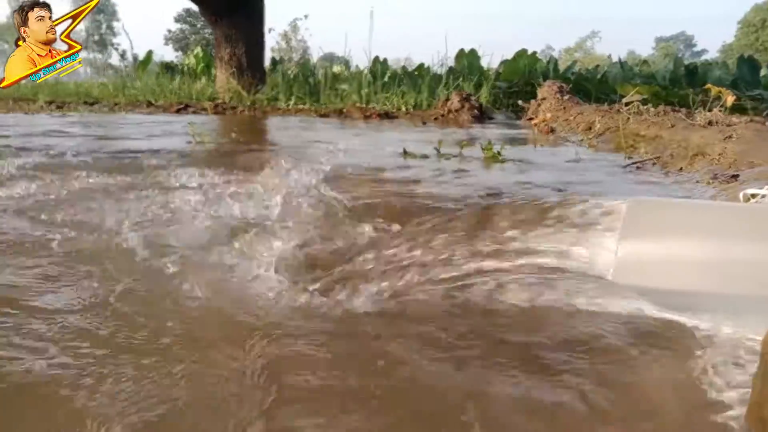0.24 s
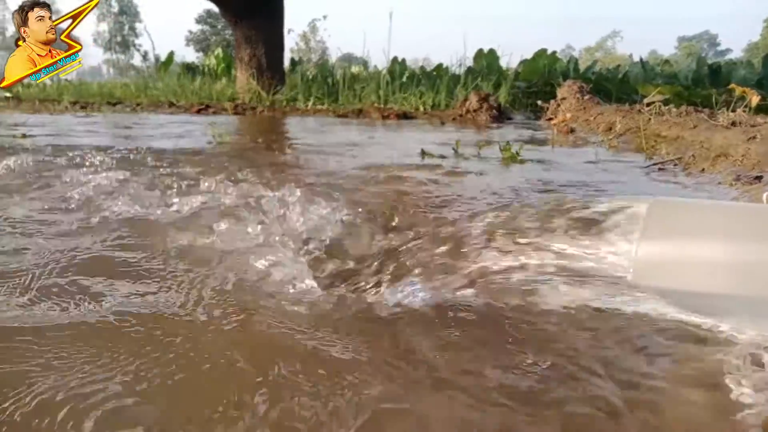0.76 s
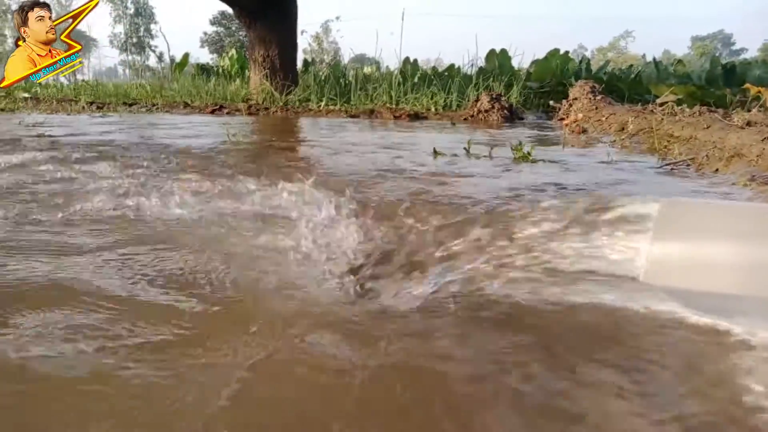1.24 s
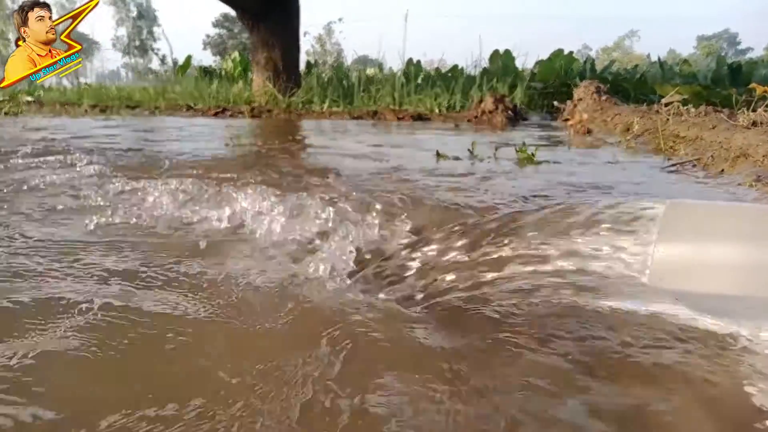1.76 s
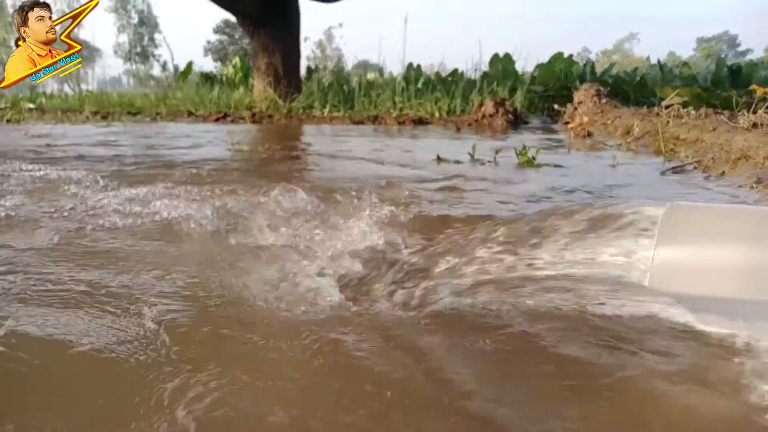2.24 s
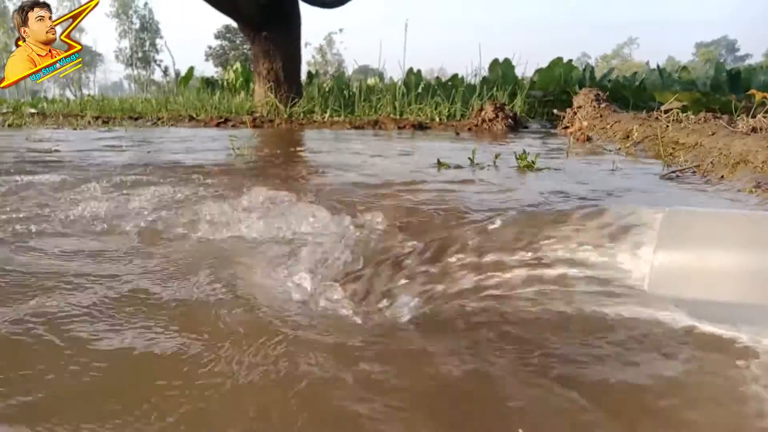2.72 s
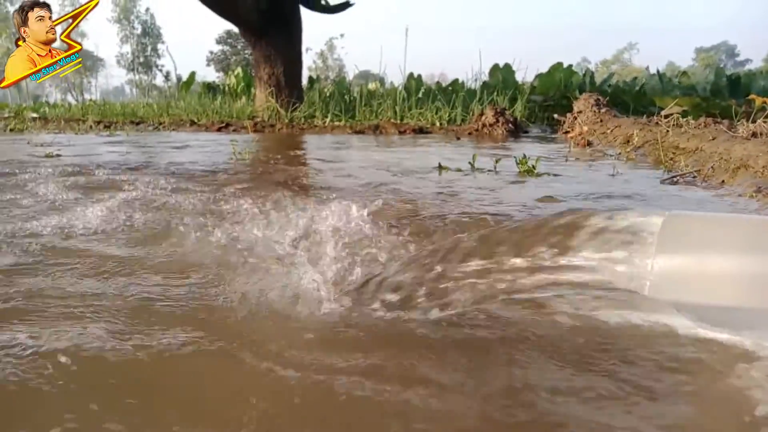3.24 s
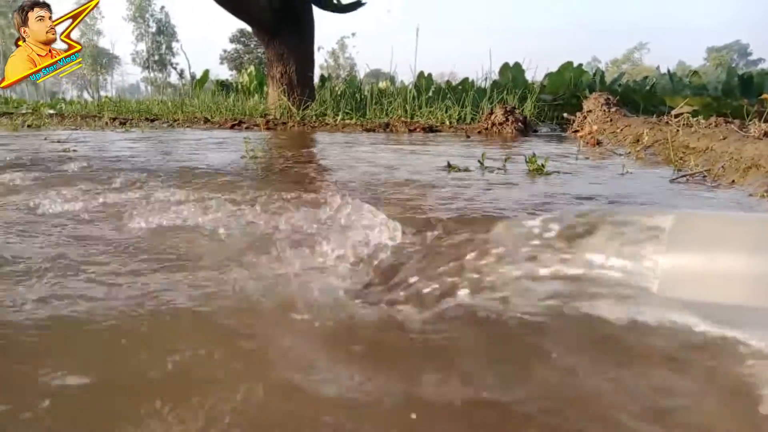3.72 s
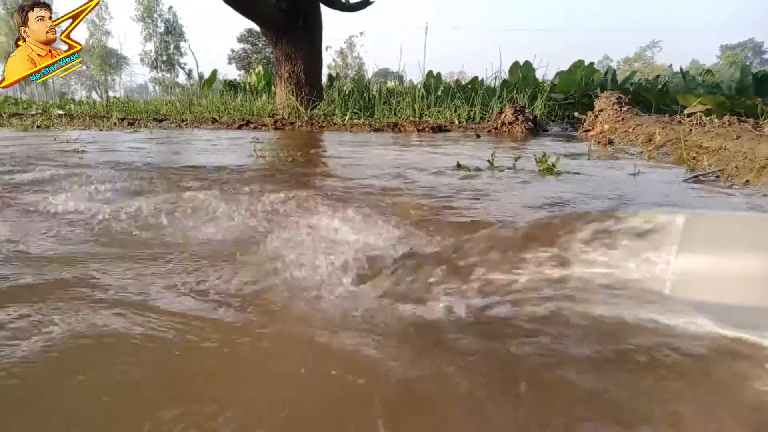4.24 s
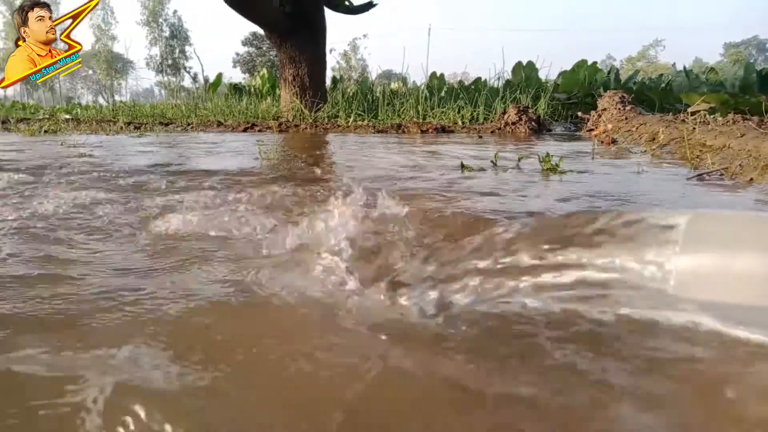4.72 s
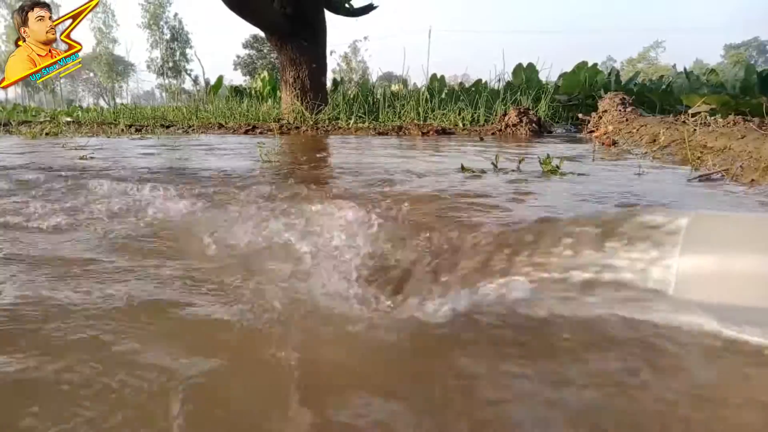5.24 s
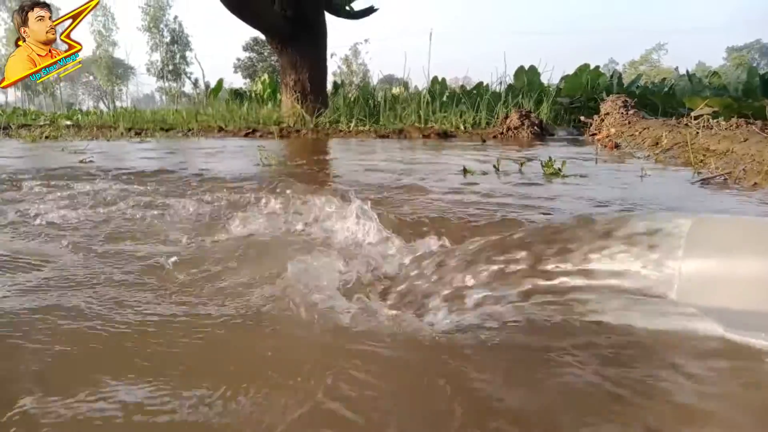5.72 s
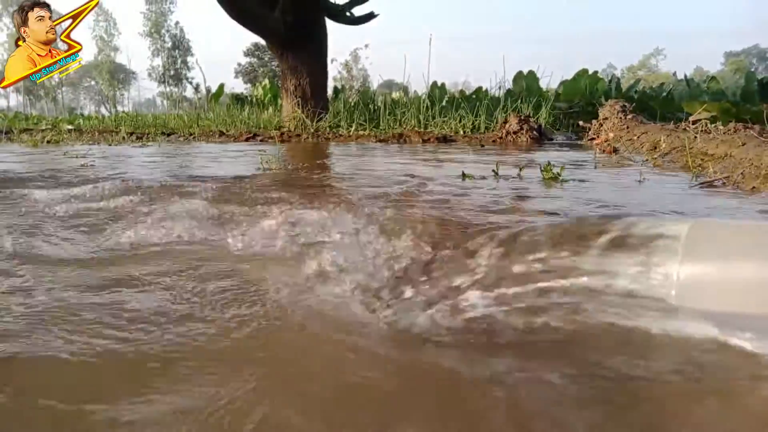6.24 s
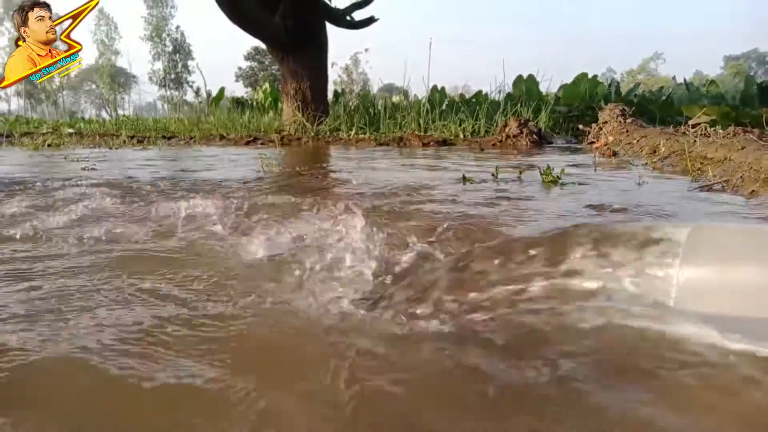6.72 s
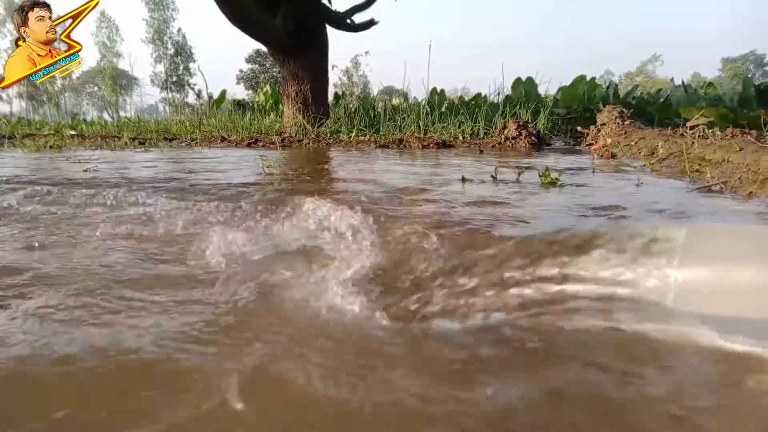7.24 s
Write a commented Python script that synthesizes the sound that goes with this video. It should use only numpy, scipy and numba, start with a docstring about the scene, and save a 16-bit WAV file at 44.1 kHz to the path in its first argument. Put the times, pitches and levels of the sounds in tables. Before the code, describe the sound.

Water gushes steadily from a plastic pipe into a flooded field, bubbling and splashing close by, turning duller and more muffled partway through.

```python
"""A gush of water, full of ringing bubbles: a plastic pipe pours into a flooded field, close to a low-held phone.
The jet drags air under: swarms of sliding sines ring over a rush of noise bands, and big pockets glug low.
Bursts of filtered noise make the splashes and slapping droplets; two narrow bands of noise hum as a far pump.
The way to the microphone is boxy and dull, and grows more muffled in the second half."""
import sys
import numpy as np
from scipy import signal
from scipy.fft import rfft, irfft
from scipy.io import wavfile
from scipy.ndimage import uniform_filter1d
from numba import njit

SR = 44100
rng = np.random.default_rng(int(sys.argv[2]) if len(sys.argv) > 2 else 0)


def log_audio(samples):
    """Write samples as a 16-bit WAV file to the path given in sys.argv[1]."""
    # one column per channel
    frames = np.atleast_2d(samples).T
    # limit to full scale, then quantise
    limited = np.clip(frames, -1, 1)
    pcm = np.round(limited * 32767).astype(np.int16)
    wavfile.write(sys.argv[1], SR, pcm)


N = 329427
T = np.arange(N) / SR  # seconds
HZ = np.maximum(np.arange(N // 2 + 1) * SR / N, 1)  # pitch of each bin of a whole-length spectrum

# Loud single bubbles that stand out close to the microphone.
# Each row: start in seconds, peak in dB, starting pitch in Hz, length in cycles of that pitch (at least 2 sound).
LOUD_BUBBLES = [(0.037, -23, 1730, 27), (0.078, -10, 1946, 26), (0.046, -18, 910, 10.5),
                (0.128, -21.5, 1020, 28), (0.144, -21, 970, 28), (0.183, -22.5, 1240, 18),
                (0.366, -14, 3120, 10), (0.432, -15, 2140, 5), (0.447, -1, 2490, 3.5),
                (0.483, -23, 1700, 30), (0.585, -19.5, 940, 11), (0.606, -11, 2370, 6.5),
                (0.637, -20.5, 1150, 16), (0.647, -25, 1200, 25), (0.692, -18.5, 1920, 7),
                (0.783, -16, 1210, 18), (0.805, -18.5, 880, 10), (0.856, -16.5, 2980, 8),
                (0.88, -23, 1880, 7), (0.908, -22, 1092, 20), (0.939, -15, 2670, 22),
                (1.087, -10, 2480, 11), (1.163, -15, 2440, 18), (1.192, -14, 1430, 13),
                (1.193, -18, 840, 9), (1.202, -15, 2580, 20), (1.243, -20, 1270, 37),
                (1.221, -11.5, 1900, 14), (1.275, -7.5, 2520, 8), (1.301, -18, 1550, 29),
                (1.33, -20.5, 1194, 22), (1.373, -3.5, 2480, 21), (1.397, -11.5, 2510, 19),
                (1.398, -28.5, 896, 10), (1.412, -22.5, 890, 15), (1.439, -16, 2580, 50),
                (1.474, -17.5, 2670, 14), (1.508, -13.5, 1750, 12), (1.545, -12.5, 2480, 33),
                (1.575, -12, 2620, 15), (1.651, -22.5, 1395, 22), (1.77, -16.5, 2570, 26),
                (1.89, -26.5, 790, 12), (1.948, -24, 686, 9), (1.958, -5.5, 2520, 9),
                (1.99, -13.5, 1460, 10), (2.056, -14.5, 1655, 26), (2.097, -10.5, 2490, 28),
                (2.1, -16, 2580, 26), (2.113, -20, 1440, 14), (2.141, -14, 815, 3), (2.142, -21, 2520, 1),
                (2.168, -19, 2500, 35), (2.194, -13, 2370, 19), (2.209, -11.5, 1790, 20),
                (2.26, -10.5, 2550, 27), (2.267, -12.5, 1720, 11), (2.288, -6.5, 2430, 10),
                (2.296, -23.5, 1205, 30), (2.371, -15, 3785, 23), (2.408, -20, 2330, 44),
                (2.641, -15, 2490, 18), (2.662, -15.5, 2580, 25), (2.754, -15.5, 1720, 11),
                (2.804, -19.5, 1384, 34), (2.837, -10, 3180, 22), (2.896, -19, 2370, 15),
                (2.933, -11.5, 1387, 24), (2.97, -13, 1227, 22), (3.056, -10.5, 2505, 40),
                (3.076, -24, 867, 20), (3.123, -14, 2590, 11), (3.161, -13, 2420, 11),
                (3.087, -19.5, 845, 22), (3.189, -25.5, 1100, 20), (3.229, -17, 2520, 33),
                (3.262, -20, 1750, 7), (3.342, -18.5, 1730, 12), (3.362, -21.5, 701, 13),
                (3.467, -15.5, 1670, 18), (3.505, -14.5, 2540, 35), (3.568, -16, 1510, 11),
                (3.644, -17, 2540, 32), (3.66, -9, 2800, 10), (3.701, -17.5, 1250, 19),
                (3.759, -14.5, 2520, 22), (3.803, -15, 2420, 15), (3.818, -14, 2500, 14),
                (3.862, -15.5, 1176, 18.5), (3.954, -19, 2480, 44), (4.022, -15, 1776, 7.5),
                (4.17, -14, 2020, 18), (4.186, -13.5, 2400, 17.5), (4.193, -19, 2236, 18),
                (4.216, -18, 2450, 23), (4.299, -15, 1490, 12), (4.315, -17.5, 2070, 23),
                (4.433, -15, 2440, 11), (4.456, -19.5, 1840, 18), (4.477, -15.5, 1830, 13),
                (4.495, -13, 1284, 16), (4.503, -11, 1865, 23), (4.6, -18.5, 2000, 16),
                (4.705, -21, 2580, 27), (4.722, -20, 1306, 22), (4.745, -20.5, 1690, 14),
                (4.777, -19.5, 2470, 20), (4.819, -15, 1900, 14), (4.871, -22.5, 1450, 24),
                (5.028, -20.5, 1470, 19), (5.047, -21.5, 2650, 16), (5.147, -18, 1450, 14),
                (5.416, -13.5, 1280, 4.5), (5.475, -6.5, 2154, 16), (5.499, -17.5, 960, 8.5),
                (5.544, -14, 1430, 11), (5.656, -16.5, 1051, 38), (5.667, -19, 1710, 11),
                (5.697, -7, 1885, 30), (5.725, -13.5, 927, 13.5), (5.781, -15.5, 1200, 3),
                (5.943, -24, 1190, 22), (6.01, -23.5, 975, 16), (6.062, -27, 1250, 13),
                (6.09, -25, 1180, 19), (6.105, -19, 636, 2), (6.157, -19.5, 1900, 19),
                (6.2, -19, 1530, 8.5), (6.234, -26, 1245, 30), (6.264, -24.5, 900, 10),
                (6.329, -25, 667, 3.5), (6.353, -22, 1830, 27), (6.444, -23, 1490, 12),
                (6.55, -20, 1290, 11), (6.586, -26, 1070, 23), (6.631, -24.5, 865, 23),
                (6.672, -23, 1940, 19), (6.709, -23.5, 1180, 17), (6.738, -29.5, 1210, 21),
                (6.894, -17, 1556, 10), (6.992, -23.5, 1930, 18), (6.952, -26, 790, 10),
                (7.014, -17.5, 2510, 8), (7.183, -18, 954, 9.5), (7.277, -20.5, 1306, 8),
                (7.352, -17.5, 1540, 11), (7.359, -21.5, 1214, 28), (7.438, -23, 1200, 12),
                (7.456, -21.5, 1210, 27)]


def undb(db):
    """Decibels to gain."""
    return 10 ** (np.asarray(db) / 20)


def level(x, db):
    """Scale to an rms level in dB."""
    return x * undb(db) / np.sqrt(np.mean(x ** 2))


def walk(rate):
    """Random levels held 1 / rate s and slewed twice; spread near 1."""
    hold = int(SR / rate)
    steps = np.repeat(rng.standard_normal(N // hold + 1), hold)
    return 1.25 * uniform_filter1d(uniform_filter1d(steps, hold), hold)[:N]


def through(x, gain_db):
    """Filter by the causal, minimum-phase response that has the given gain over pitch."""
    hz = np.maximum(np.arange(4097) * SR / 8192, 1)
    cepstrum = irfft(np.log(undb(gain_db(hz))))
    # folding the cepstrum forward in time makes the response causal
    cepstrum[1:4096] *= 2
    cepstrum[4097:] = 0
    response = irfft(np.exp(rfft(cepstrum)))
    return signal.fftconvolve(x, response)[:N]


def cavity_db(hz):
    """Resonant bumps and dips of the hollow around the microphone."""
    # Each row: centre in Hz, width in Hz, height in dB (negative is a dip).
    cavity = [(301, 286, 13.5), (328, 44, -10), (1042.4, 30, -6.5), (1262, 165, 6), (1342, 71, -7.5),
              (1892, 140, 5), (2234, 72, -11), (2494, 150, 5), (3035, 29, -19.5), (3180, 240, 7),
              (3410, 110, -4), (3660, 200, 6.5), (3905, 240, -5.5)]
    return sum(bump_db / (1 + (2 * (hz - centre) / width) ** 2) for centre, width, bump_db in cavity)


def colour_db(hz):
    """Gain of the way from the water to the microphone, cavity included."""
    # Broad colour of the way. Each row: pitch in Hz, gain in dB.
    colour = [(25, -57), (71, -7.5), (141, -23.5), (243, -20.5), (339, -26), (429, -13.5), (1030, -2.5),
              (1250, -2.5), (2200, -5.5), (2480, -3), (3700, -14), (7190, -54.5), (9350, -71.5)]
    f, db = np.transpose(colour)
    return np.interp(np.log(hz), np.log(f), db) + cavity_db(hz)


def loud_bubble_way_db(hz):
    """The loud bubbles pass the cavity and are heard dull towards the top."""
    top_hz = 4150
    return cavity_db(hz) - 10 * np.log10(1 + (hz / top_hz) ** 8)


def bass_share(hz):
    """Part of the sound that the muffling leaves alone: the pitches well below muffle_hz."""
    muffle_hz = 2247
    return 1 / (1 + (hz / muffle_hz) ** 4.56)


@njit
def ring(n, sr, start, hz, cycles, gain, glide, rise):
    """Each bubble is a sine that swells softly, dies away over its cycles and slides up as it nears the surface."""
    out = np.zeros(n)
    for e in range(len(start)):
        length = cycles[e] * sr / hz[e]
        phase = 0.
        for i in range(min(int(length), n - start[e])):
            u = i / length  # share of the bubble's life
            phase += 2 * np.pi * hz[e] * (1 + glide[e] * u) / sr
            swell = np.sin(np.pi / 2 * min(u / rise, 1.)) ** 2
            decay = np.exp(-np.log(1000) * max(u - rise, 0.) ** 1.4)
            out[start[e] + i] += gain[e] * np.sin(phase) * swell * decay
    return out


def singles(s, db, hz, cycles, glide, rise):
    """Single bubbles that stand out of the gush, each ringing from its own start."""
    start = (s * SR).astype(np.int64)
    return ring(N, 1. * SR, start, hz, np.maximum(cycles, 2), undb(db), glide + 0 * s, rise)


def litter(s, db, hz, cycles, glide, rings_db, lag_cycles, scatter):
    """Each single bubble tears off three smaller, softer ones of nearby pitch just after it."""
    s, db, hz, cycles = np.repeat([s, db, hz, cycles], 3, axis=1)
    lag, softer, detune = rng.random((3, len(s)))
    near_hz = hz * np.exp(scatter * (2 * detune - 1))
    late_s = s + lag_cycles / hz * lag
    return singles(late_s, db + rings_db - 6 * softer, near_hz, cycles, glide, 0.073)


def pump():
    """Two wavering low tones from far off, cut from noise; the lower fades as the upper grows."""
    # Each row: pitch in Hz, width in Hz, first level in dB, last level in dB.
    hum = [(81, 8.8, -59.5, -69.5), (116.6, 3.9, -60.5, -57.5)]
    turn_s, turn_width_s = 5, 0.86  # when and how fast the hum changes level
    turn = .5 + .5 * np.tanh((T - turn_s) / turn_width_s)
    out = 0
    for hz, width, first_db, last_db in hum:
        white = rfft(rng.standard_normal(N))
        tone = level(irfft(white / (1 + (2 * (HZ - hz) / width) ** 2), N), 0)
        # evened out, it wavers in pitch more than in level
        tone = tone / np.sqrt(0.36 + np.abs(signal.hilbert(tone)) ** 2 / 2)
        out = out + tone * undb(first_db + (last_db - first_db) * turn)
    return out


def spray():
    """A fine flickering hiss of dense droplets; each slap adds a short burst of hiss and of a duller body."""
    # Droplets slapping the surface. Each row: start in seconds, hiss level in dB, body over the hiss in dB.
    slaps = [(0.056, -35, 6), (0.278, -30, 2), (0.3501, -34, -2), (0.4016, -25, 3), (0.768, -26, -3),
             (0.859, -39, 5), (0.884, -33, 3), (1.021, -33, 13.5), (1.1985, -31, 20.5), (1.507, -38, 16),
             (1.957, -28.5, 15), (2.0937, -44, 22), (2.29, -42, 27), (2.37, -36, 10), (2.62, -26.5, -6),
             (2.743, -23.5, 7), (2.8977, -28.5, 22), (3.4665, -35.5, 22.5), (3.65, -29.5, 13),
             (3.858, -32, 18.5), (4.022, -26, 14), (4.169, -26.5, -1), (4.2682, -34, 7), (4.378, -29, 11),
             (4.554, -34.5, 19), (4.68, -39, 17), (5.1577, -43, 7), (5.341, -42, 14), (5.473, -47.5, 31.5),
             (5.5216, -44, 18), (5.5667, -46, 7), (5.618, -42.5, 4), (5.669, -44.5, 21.5),
             (5.7436, -44, 22), (5.787, -43, 21.5), (5.914, -48.5, 23), (5.9522, -43.5, 13),
             (5.978, -45, 10), (6.0517, -41, 5), (6.065, -49.5, 26), (6.187, -49.5, 27), (6.217, -51, 31.5),
             (6.328, -43, 10), (6.3394, -46.5, 25), (6.362, -43, 18), (6.549, -42.5, 22.5),
             (6.661, -42, 19), (6.891, -44.5, 21.5), (7.016, -52, 18), (7.1477, -46.5, 22),
             (7.179, -40, 24)]
    slap_t60_s, slap_rise_s = 0.0258, 0.0036
    white = rfft(rng.standard_normal((3, N)))
    hiss = level(irfft(white[0] * (HZ / 4300) ** 3 / (1 + (HZ / 4300) ** 11.5), N), 0)
    body = level(irfft(white[1] * (HZ / 2600) ** 2 / (1 + (HZ / 2600) ** 11), N), 0)
    mist = level(irfft(white[2] * (HZ / 4200) ** 4 / (1 + (HZ / 4200) ** 8.7), N), 0)
    out = mist * undb(-72.5 + 5.0 * walk(30) + 2.3 * walk(110))
    for s, db, body_db in slaps:
        i = int(s * SR)
        t = T[:min(2500, N - i)]
        burst = undb(db - 60 * t / slap_t60_s) * np.minimum(t / slap_rise_s, 1)
        end = i + len(t)
        out[i:end] += burst * (hiss[i:end] + undb(body_db) * body[i:end])
    return out


def glugs():
    """Big air pockets ring low and briefly, each with its litter."""
    # Each row: start in seconds, peak in dB, starting pitch in Hz.
    pockets = [(0.128, -32, 225), (0.273, -33, 233), (0.502, -36.5, 410), (0.714, -34, 425),
               (0.885, -32, 466), (1.165, -38, 261), (1.348, -37, 420), (1.442, -29, 448),
               (1.464, -28.5, 396), (1.466, -33.5, 245), (1.569, -34, 464), (1.814, -37.5, 425),
               (1.932, -30, 242), (2.136, -30.5, 243), (2.403, -39, 220), (2.455, -36, 502),
               (2.727, -33, 426), (2.737, -36.5, 238), (2.852, -27, 441), (3.118, -36, 256),
               (3.189, -41.5, 272), (3.237, -40, 275), (3.561, -33.5, 257), (4.085, -39, 233),
               (4.132, -28, 456), (4.377, -30.5, 252), (4.74, -32, 119), (4.929, -36, 207),
               (5.21, -38, 478), (5.275, -29.5, 438), (5.337, -33.5, 498), (5.534, -26, 276),
               (5.669, -29, 233), (5.814, -27, 274), (5.89, -40.5, 277), (6.059, -37, 239),
               (6.258, -32.5, 273), (6.366, -34, 482), (6.527, -42, 227), (6.764, -33.5, 253),
               (6.92, -39, 455), (7.389, -36, 245)]
    ring_s, slide = 0.049, 0.031  # ring length; upward slide as share of pitch
    s, db, hz = np.transpose(pockets)
    glug = s, db, hz, ring_s * hz
    return singles(*glug, slide, 0.12) + litter(*glug, slide, -11.5, 3.6, 0.48)


def chirps():
    """Long bubbles that slide far upward."""
    # Each row: start in seconds, peak in dB ahead of the cavity, starting pitch in Hz, slide as share of pitch.
    sliders = [(4.735, -25, 1200, 0.61), (5.062, -31, 400, 2.5), (5.1, -27.5, 600, 0.9),
               (5.7, -32.5, 900, 0.59), (2.2, -22, 1550, 0.3)]
    s, db, hz, slide = np.transpose(sliders)
    cycles = 40 + 0 * s
    return singles(s, db, hz, cycles, slide, 0.23)


def plops():
    """The loud bubbles ring almost steady in pitch, each with its litter."""
    slide = 0.029  # share of pitch
    s, db, hz, cycles = np.transpose(LOUD_BUBBLES)
    plop = s, db - cavity_db(hz), hz, cycles  # peaks are as heard inside the cavity
    return singles(*plop, slide, 0.12) + litter(*plop, slide, -10.5, 14, 0.32)


def swarm(per_s, cycles, glide, rise, spread_db, burst_db, burst_rate, lo_hz=120, hi_hz=7500):
    """Bubbles of all sizes in bursts; a few are far louder than the rest."""
    calm_hz = 3080  # towards and above this pitch the bubbles are more alike in level
    when, pitch, luck, life, slip = rng.random((5, int(per_s * N / SR)))
    start = (when * N).astype(np.int64)
    hz = lo_hz * (hi_hz / lo_hz) ** pitch
    spread_db = spread_db / (1 + (hz / calm_hz) ** 2.2)
    db = np.minimum(-spread_db * np.log(1 - luck), 3.7 * spread_db) + burst_db * walk(burst_rate)[start]
    slide = glide * slip / (1 + (hz / 1500) ** 2)  # small bubbles die before they rise far
    cycles = cycles * (.5 + life) * (hz / 1500) ** 0.51
    gain = hz ** 0.61 * undb(db)  # gain grows with pitch to even out the sum per hertz
    return level(ring(N, 1. * SR, start, hz, cycles, gain, slide, rise), 0)


def rush():
    """Noise of the jet shearing the water; each half octave flickers alone and surges with the others."""
    out, surge = 0, walk(31)
    white = rfft(rng.standard_normal(N))
    for hz in 30 * 2 ** np.arange(0, 8.5, .5):
        part = np.cos(np.pi * np.clip(np.log2(HZ / hz), -.5, .5)) ** 2
        flicker_db = (2.3 * surge + 1.4 * walk(22)) * min(hz / 200, 1)  # the deepest bands are steadier
        out = out + irfft(white * part, N) * undb(flicker_db)
    return level(out, 0)


def splashes(gain_db, t60_s):
    """A burst of broad noise where water closes over each loud bubble."""
    s, db = np.transpose(LOUD_BUBBLES)[:2]
    hits = np.zeros(N)
    hits[(s * SR).astype(int)] = undb(db + gain_db)
    t = T[:2000]
    tail = undb(-60 * t / t60_s) * np.minimum(t / 0.00099, 1)
    return signal.fftconvolve(hits, tail)[:N] * rng.standard_normal(N)


def flow_db():
    """Slow level of the stream, with moments where the gush briefly falls quiet."""
    # Stream level. Each row: time in seconds, level in dB.
    flow = [(0.0, -33.5), (0.31, -36), (0.75, -33.5), (1.02, -35), (1.39, -36), (1.52, -33.5),
            (1.79, -34.5), (2.16, -34.5), (2.27, -34.5), (2.54, -34.5), (2.77, -34.5), (3.51, -34),
            (4.14, -35), (4.6, -33), (5.37, -34.5), (5.64, -31.5), (5.82, -34.5), (7.47, -35.5)]
    # Brief lulls. Each row: time in seconds, change of level in dB.
    lulls = [(0.831, -5.5), (1.1, -1.5), (1.616, -7), (2.399, -3), (3.035, -3.5), (3.891, -0.5), (4.37, -1),
             (4.58, -3.5), (5.33, -4.5), (5.38, -3.5), (6.87, -4.5), (7.11, -2), (7.24, -2.5), (7.41, -2)]
    half_width_s = 0.019
    out = np.interp(T, *np.transpose(flow))
    for s, depth_db in lulls:
        out = out + depth_db * np.exp(-((T - s) / half_width_s) ** 2)
    return out


def gush():
    """Swarms, rush and splashes, coloured on the way to the microphone, then muffled and levelled."""
    # Muffling of the treble. Each row: time in seconds, treble gain in dB.
    muffle = [(0, 9.5), (.7, 7.5), (1.3, 8.5), (2.5, 7.5), (3.6, 7), (4.4, 6.5), (4.6, 2.5), (4.8, -8),
              (5.1, -10.5), (5.8, -18), (6.3, -13.5), (6.8, -15), (7.47, -9)]
    gurgle = swarm(900, 21, 0.92, 0.076, 2.74, 0.61, 22)
    # sparse long bubbles that slide audibly
    warble = swarm(90, 44, 1.5, 0.3, 3.0, 0.64, 22, lo_hz=330, hi_hz=2000)
    fizz = swarm(5000, 6.2, 0.66, 0.15, 2.8, 8.2, 60)
    # tiny bubbles that ring clearly
    tinkle = swarm(90, 38, 0.3, 0.2, 9.0, 1.0, 20, lo_hz=3907, hi_hz=6850)
    # sharp ticks of drops landing
    crackle = swarm(500, 2.6, 0.1, 0.21, 4.5, 3.0, 30, lo_hz=690, hi_hz=4420)
    water = undb(-7.0) * crackle + undb(-8.0) * warble + undb(-4.5) * tinkle
    water = water + undb(-2.0) * gurgle + undb(-4.0) * fizz + undb(-6.0) * rush()
    water = water + splashes(gain_db=22, t60_s=0.026)
    heard = through(water, colour_db)
    bass = irfft(rfft(heard) * bass_share(HZ), N)
    treble = heard - bass
    mixed = bass + treble * undb(np.interp(T, *np.transpose(muffle)))
    return mixed / np.std(bass) * undb(flow_db())


def scene():
    """The far hum, the spray, the glugs, and the gush with its loud bubbles."""
    loud = through(plops() + chirps(), loud_bubble_way_db)
    return (pump() + spray() + glugs() + loud + gush())[None]


def record(dry):
    """The phone cuts the deepest bass and the top."""
    low_hz, top_hz = 42, 6950
    dry = signal.sosfilt(signal.butter(4, low_hz, "high", fs=SR, output="sos"), dry)
    return signal.sosfilt(signal.ellip(8, .2, 60, top_hz, fs=SR, output="sos"), dry)


dry = scene()
out = record(dry)
log_audio(out)
```